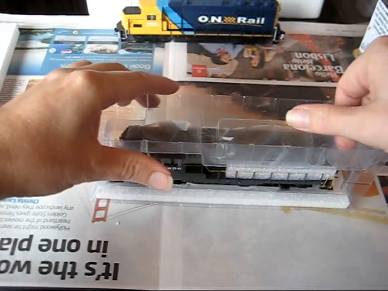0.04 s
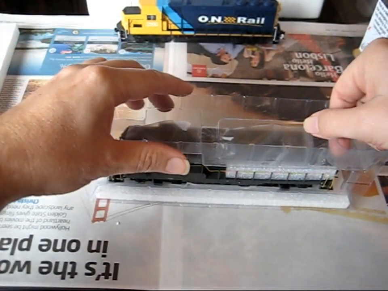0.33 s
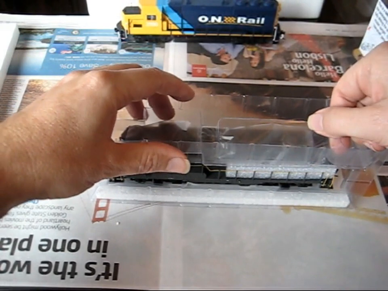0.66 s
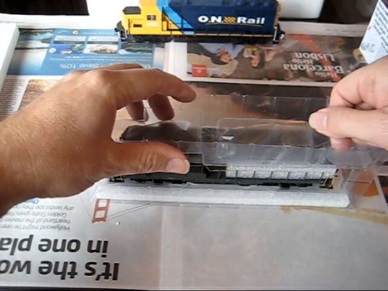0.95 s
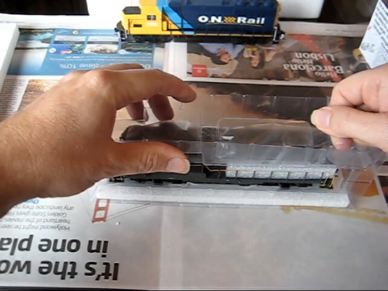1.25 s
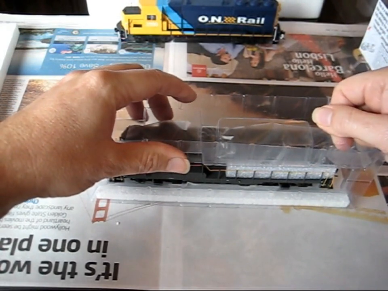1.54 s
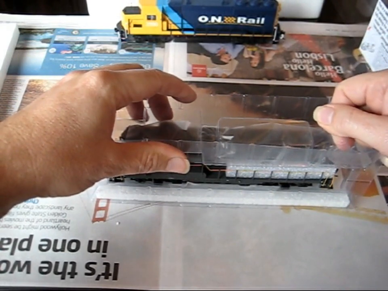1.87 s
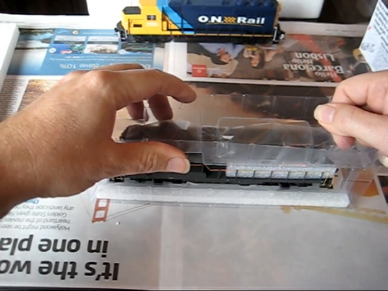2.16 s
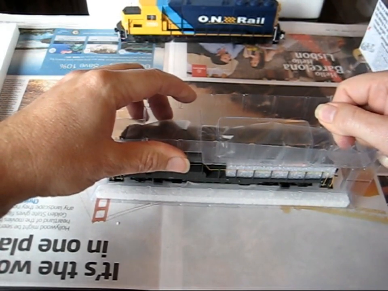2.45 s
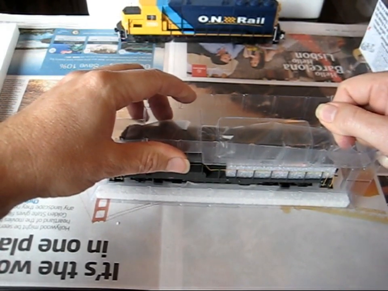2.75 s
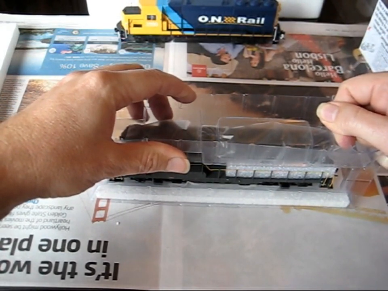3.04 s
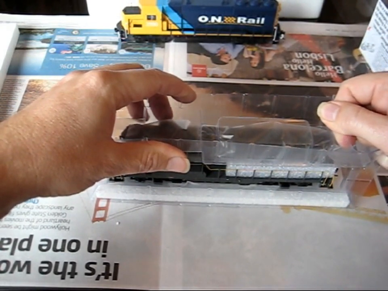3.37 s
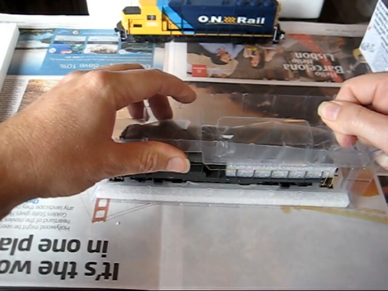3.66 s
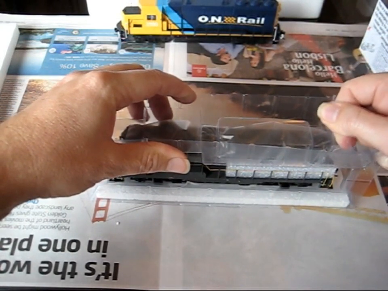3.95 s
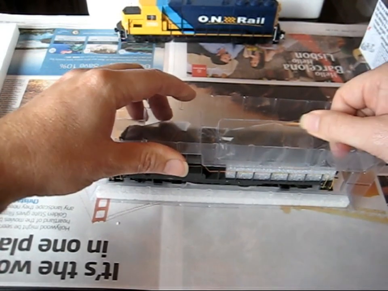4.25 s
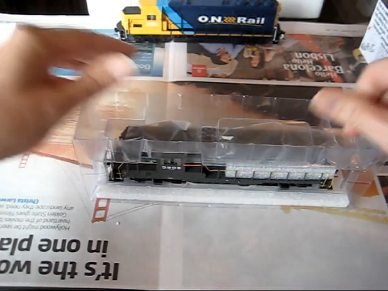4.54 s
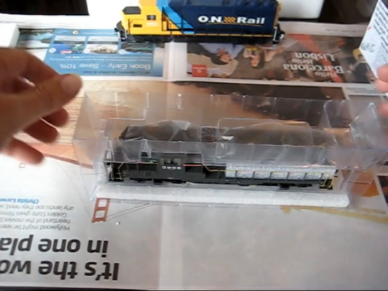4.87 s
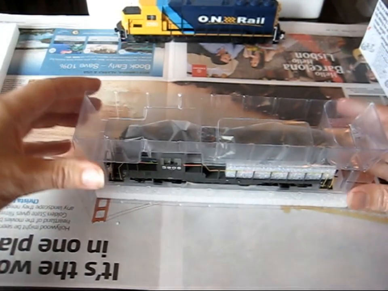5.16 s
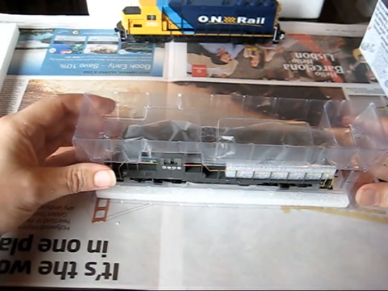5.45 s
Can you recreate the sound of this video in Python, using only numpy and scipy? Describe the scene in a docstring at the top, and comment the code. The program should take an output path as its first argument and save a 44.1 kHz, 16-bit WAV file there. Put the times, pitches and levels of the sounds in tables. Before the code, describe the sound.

A plastic sleeve slides off with a quick swish. Hands then work at a stiff plastic pack on a table, making soft rubbing, a few bright snaps, faint ticks and small hollow knocks. About four seconds in, the lid comes free with a light thud and a flurry of clicks and rustling. Fingers stroke a flap and a few clicks follow. The microphone is close, in a small room with soft hiss and a thin whine.

```python
"""Hands unfold a stiff plastic blister pack on a paper-covered table, close to a small, thinly whining camera.
Over soft room noise the sleeve swishes off, the plastic groans faintly and the lid buckles in bright snaps.
The tray ticks under the fingers while sheet rubs on sheet and panels give way with hollow knocks.
Near 4 s the lid comes free with a thud and a flurry of clicks; then fingers stroke the end flap
and a few last clicks follow. A small room answers each move briefly."""
import sys
import numpy as np
from scipy import signal
from scipy.fft import rfft, irfft, next_fast_len
from scipy.io import wavfile
from scipy.ndimage import uniform_filter1d

SR = 44100
rng = np.random.default_rng(int(sys.argv[2]) if len(sys.argv) > 2 else 0)


def dump(signal):
    """Clip the signal to [-1, 1] and save it as 16-bit WAV at the path in sys.argv[1]."""
    limited = np.clip(np.atleast_2d(signal).T, -1, 1)
    pcm = np.round(limited * 32767).astype(np.int16)
    wavfile.write(sys.argv[1], SR, pcm)


N = 251811
TAPS = 4096  # samples in one click, knock or filter
HZ = np.fft.rfftfreq(TAPS, 1 / SR)
TIME = np.arange(N) / SR

# resonances of the lid: (frequency [Hz], width [Hz], level [dB])
LID_MODES = [(900, 98, -1.5), (1296, 450, 8), (1380, 120, 7), (2310, 230, 1), (2926, 100, 0),
             (3150, 120, 0), (3830, 140, -8), (4820, 240, -4.5), (5270, 700, -11), (6170, 200, -6.5),
             (6920, 260, -7), (7930, 300, -10.5), (8740, 430, -8.5), (11100, 600, -16), (12600, 1000, -18)]


def amp(db):
    """Decibels to gain."""
    return 10 ** (np.asarray(db) / 20)


def unit_rms(x):
    """Scales to rms 1."""
    return x / np.sqrt(np.mean(x ** 2) + 1e-20)


def curve_at(points, hz):
    """Reads a (frequency, value) curve on a log-frequency axis."""
    f, value = np.transpose(points)
    return np.interp(np.log(hz + 1), np.log(f + 1), value)


def add(mix, start_s, sound):
    """Mixes a sound in at its start time."""
    part = mix[max(round(start_s * SR), 0):][:len(sound)]
    part += sound[:len(part)]


def causal(gain):
    """The most compact causal response with this gain on the grid HZ."""
    log_gain = np.log(np.maximum(gain, 1e-5))
    mirrored = np.concatenate([log_gain, log_gain[-2:0:-1]])
    return np.fft.ifft(np.exp(np.conj(signal.hilbert(mirrored)))).real


def drift(rate_hz):
    """A smooth random wander of rms 1, mostly slower than rate_hz."""
    size = next_fast_len(N)
    hz = np.fft.rfftfreq(size, 1 / SR)
    spectrum = rfft(rng.standard_normal(size)) / (1 + (hz / rate_hz) ** 4)
    return unit_rms(irfft(spectrum, size)[:N])


def held_envelope(moves, attack_s, release_db_per_s):
    """Each move gathers speed, holds it and dies away; overlapping moves add in power."""
    power = np.zeros(N)
    for start, length, db in moves:
        t = TIME - start
        attack = np.clip(t / attack_s, 0, 1)
        power += (attack * amp(db - release_db_per_s * np.maximum(t - length, 0))) ** 2
    return np.sqrt(power)


def arch_envelope(moves, steepness):
    """Each quick move speeds up and slows down in one arch."""
    return sum(amp(db) * abs(np.sin(np.pi * np.clip((TIME - start) / length, 0, 1))) ** steepness
               for start, length, db in moves)


def shell(modes):
    """Gain on the grid HZ of a thin shell with these resonances."""
    power = sum(amp(db) ** 2 / (1 + ((HZ ** 2 - hz ** 2) / (width * HZ + 1)) ** 2)
                for hz, width, db in modes)
    return np.sqrt(power)


def room_tone():
    """A steady bed of room noise and microphone hiss."""
    # noise colour: (frequency [Hz], level [dB])
    colour = [(20, -7.5), (50, -4.5), (190, -3.5), (255, 0.5), (330, -0.5), (1400, -4), (3000, -7.5),
              (5000, -9.5), (6000, -10), (8500, -14.5), (10500, -13), (12500, -19.5), (14000, -14.5),
              (15200, -25)]
    gain = amp(curve_at(colour, np.fft.rfftfreq(N, 1 / SR)))
    return amp(-50) * unit_rms(irfft(rfft(rng.standard_normal(N)) * gain, N))


def camera_whine():
    """The camera's clock runs slightly fast and is pulled back into step at every picture frame."""
    # clock partials: (harmonic number, level [dB])
    partials = [(1, -63), (2, -61.5)]
    # weaker steady electronic tones: (frequency [Hz], level [dB])
    steady_tones = [(7854, -72), (7881, -75), (15625, -79)]
    clock_hz, frame_hz, fast_by_hz = 7560, 30, 9
    lead = uniform_filter1d(fast_by_hz * (TIME % (1 / frame_hz)), size=170)
    turns = clock_hz * TIME + lead + 0.013 * drift(8)
    clock = sum(amp(db) * unit_rms(np.sin(2 * np.pi * k * turns)) for k, db in partials)
    tones = sum(amp(db) * unit_rms(np.sin(2 * np.pi * hz * TIME + 0.33 * drift(8)))
                for hz, db in steady_tones)
    return amp(0.4) * (clock + tones)


def room_tail(x):
    """Shell and room ring on in a short, dense tail whose treble dies first."""
    # decay times: (frequency [Hz], t60 [s])
    decay = [(300, 0.49), (1300, 0.31), (4500, 0.17), (9000, 0.1), (15000, 0.19)]
    hz, t, noise = signal.stft(rng.standard_normal(SR // 2), SR, nperseg=256)
    tail = signal.istft(noise * amp(-60 * t / curve_at(decay, hz)[:, None]), SR, nperseg=256)[1]
    tail *= 1 - np.exp(-(np.arange(len(tail)) / SR / 0.0018) ** 2)  # soft onset
    return signal.fftconvolve(x, tail / np.linalg.norm(tail))[:N]


def plastic_groan():
    """As the plastic slides, its slips lock briefly into one faint, unsteady note."""
    # the slide: (start [s], length [s], level [dB])
    moves = [(.19, .22, -54.5)]
    pitch_hz = 454 * (1 + 0.039 * drift(66))
    tone = unit_rms(np.sin(2 * np.pi * np.cumsum(pitch_hz) / SR))
    return arch_envelope(moves, steepness=0.72) * amp(3.3 * drift(30)) * tone


def friction(colour, slips_per_s, spread_db, flutter_db, resonance):
    """Tiny stick-slip grains of uneven size, coloured by the sheet that they shake."""
    sizes = amp(spread_db * np.minimum(rng.exponential(1, N), 4)) * rng.choice([-1, 1], N)
    grains = sizes * (rng.random(N) < slips_per_s / SR)
    lid_db = 20 * np.log10(shell(LID_MODES) + 1e-4)
    ripple_db = lid_db - uniform_filter1d(lid_db, size=150)  # the lid's peaks without its overall tilt
    sheet = causal(amp(curve_at(colour, HZ) + resonance * ripple_db))
    return unit_rms(signal.oaconvolve(grains, sheet)[:N] * amp(flutter_db * drift(60)))


def sheet_rub():
    """Sheet rubs on sheet in a soft, fluttering rustle."""
    # rubs: (start [s], length [s], level [dB])
    moves = [(.02, 0.16, -47.5), (.21, 0.32, -53), (.71, 0.053, -47.5), (1.1, .05, -50.5),
             (1.47, 1.0, -62.5), (4.05, .05, -44.5), (4.11, 0.12, -41), (4.285, 0.19, -42)]
    # rustle colour: (frequency [Hz], level [dB])
    colour = [(180, -20), (300, -16), (691, -2), (1470, -0.5), (1850, 7.5), (2100, -0.5), (2360, 4),
              (3070, -1), (3790, -0.5), (6300, -4), (7670, -11), (11400, -13.5), (15000, -24)]
    envelope = held_envelope(moves, attack_s=0.014, release_db_per_s=132)
    return envelope * friction(colour, slips_per_s=5000, spread_db=1, flutter_db=2.5, resonance=0.26)


def flap_stroke():
    """Fingers stroke along the end flap with a smooth, even grain."""
    # strokes: (start [s], length [s], level [dB])
    moves = [(5.222, 0.031, -46), (5.275, 0.13, -42), (5.44, .04, -47), (5.48, 0.076, -42.5),
             (5.665, 0.016, -42.5)]
    # stroke colour: (frequency [Hz], level [dB])
    colour = [(180, -38), (300, -22), (459, -24), (550, -1.5), (616, -19), (1110, -7), (1290, -9.5),
              (1650, -0.5), (1880, -7), (2320, -3.5), (3920, -6), (4770, -8), (15000, -24.5)]
    envelope = held_envelope(moves, attack_s=0.015, release_db_per_s=190)
    return envelope * friction(colour, slips_per_s=5000, spread_db=0.5, flutter_db=1.1, resonance=0.37)


def sleeve_swish():
    """The sleeve slides off in a short tug and a longer pull."""
    # tug and pull: (start [s], length [s], level [dB])
    moves = [(-.013, .036, -32.5), (.017, 0.059, -26)]
    # swish colour: (frequency [Hz], level [dB])
    colour = [(180, -40), (300, -25), (685, -26), (835, -9), (1350, -14.5), (2070, 3), (2830, -8),
              (3870, 2), (4420, -13.5), (5130, 1), (10100, -17), (12700, -20), (15500, -48)]
    envelope = arch_envelope(moves, steepness=1.24)
    return envelope * friction(colour, slips_per_s=9000, spread_db=2.5, flutter_db=1.5, resonance=0.49)


def panel_mode(hz, db, t60):
    """One mode of a panel, swelling within its first cycle and quickly damped."""
    t = np.arange(TAPS) / SR
    envelope = (1 - np.exp(-2 * hz * t)) * np.exp(-np.log(1000) * t / t60)
    return amp(db) * envelope * np.sin(2 * np.pi * hz * t)


def table_thud():
    """The pack thuds on the table as the lid comes free."""
    # low modes of the thud: (frequency [Hz], level [dB], t60 [s])
    modes = [(90, -34, .03), (260, -27.5, 0.016)]
    out = np.zeros(N)
    add(out, start_s=4.1215, sound=sum(panel_mode(*row) for row in modes))
    return out


def panel_knocks():
    """A whole panel gives way and rings with one hollow note, the higher the shorter."""
    # knocks: (time [s], pitch [Hz], level [dB])
    knocks = [(.9415, 2900, -25), (2.0142, 2380, -27.5), (2.074, 980, -36.5), (2.8187, 1100, -38),
              (3.9005, 1166, -24), (4.0835, 935, -26.5), (4.123, 1734, -14), (4.333, 1400, -28),
              (5.0573, 954, -29.5), (5.669, 1240, -29)]
    out = np.zeros(N)
    for start, hz, db in knocks:
        add(out, start, panel_mode(hz, db, t60=30 / hz))
    return out


def shape_registers(spectrum, levels_db, depth_db, bright_db):
    """Voices a click: a wider patch of plastic lifts the low registers, a sharper crease the high ones."""
    # borders of the bass, middle, presence, treble and top registers: (frequency [Hz])
    edges = [350, 1000, 1900, 3300, 5600, 14500]
    # per register: (lift [dB per dB of depth])
    depth_lift = [1, .4, 0, 0, 0.031]
    # per register: (lift [dB per dB of brightness])
    bright_lift = [0, 0.41, 0, 0.72, 0.92]
    click_s = 0.008  # a click's level is its energy spread over this time
    band = np.digitize(HZ, edges)
    centres = np.sqrt(np.multiply(edges[1:], edges[:-1]))
    target = amp(levels_db + depth_db * np.array(depth_lift) + bright_db * np.array(bright_lift))
    for _ in range(2):  # two passes, as neighbouring registers pull on each other
        energy = 2 * np.bincount(band, abs(spectrum) ** 2)[1:-1] / TAPS
        log_gain = np.log(target / np.sqrt(energy / (click_s * SR)))
        spectrum = spectrum * rfft(causal(np.exp(curve_at(np.c_[centres, log_gain], HZ))))
    return spectrum


def clicks(rows, modes, registers_db, slip_share, bounce_ms, bounce, travel_ms, soft_hz,
           gain_db, ring_db, ring_per_depth):
    """Each click is one sudden give and a brief run of slips, ringing the shell and bouncing off the table."""
    direct, ringing = np.zeros(N), np.zeros(N)
    ms, khz = np.arange(TAPS) / SR * 1e3, HZ / 1e3
    # a small shell radiates little bass, and the contact softens the highest treble
    radiated = shell(modes) * HZ ** 3 / np.hypot(HZ ** 3, 420 ** 3) / np.hypot(1, (HZ / soft_hz) ** 3)
    # bending waves carry treble faster than bass; travel_ms is their delay at 1 kHz
    body = rfft(causal(radiated)) * np.exp(-2j * np.pi * 2 * travel_ms * np.sqrt(khz))
    for start, db, depth_db, bright_db, slip_ms in rows:
        slips = rng.standard_normal(TAPS) * np.exp(-(ms / (2 * max(slip_ms, .1))) ** 2)
        force = slip_share * slip_ms * slips / np.linalg.norm(slips)
        force[0] += 1  # the sudden give
        echo = 1 + bounce * np.exp(-2j * np.pi * khz * bounce_ms * rng.uniform(0.88, 1.04))
        levels_db = db + gain_db + np.array(registers_db)
        spectrum = shape_registers(rfft(force) * body * echo, levels_db, depth_db, bright_db)
        add(direct, start, irfft(spectrum))
        # the room gathers sound from every side of the shell, which evens out single resonances
        diffuse = np.sqrt(abs(uniform_filter1d(abs(spectrum) ** 2, size=110)))
        diffuse *= HZ ** 2 / (HZ ** 2 + 600 ** 2)
        # a deeper click shakes more of the shell and leaves more after-ring
        add(ringing, start, causal(diffuse) * amp(ring_db + ring_per_depth * depth_db))
    return direct + room_tail(ringing)


def strain_ticks():
    """Click rows for the gripped tray, which ticks faintly at loose intervals under strain."""
    # spells of strain: (start [s], length [s], level [dB], brightness [dB])
    spells = [(0.299, .32, -55, -5), (1.45, 0.87, -53, -6)]
    ticks_per_s, spread_db, depth_db, slip_ms = 8, 0.5, 9, 2.5
    rows = []
    for start, length, db, bright_db in spells:
        for k, (jitter, softness) in enumerate(rng.uniform(-1, 1, (20, 2))):
            delay = (k + (1 + jitter) / 2) / ticks_per_s
            if delay < length:
                rows.append((start + delay, db - spread_db * softness, depth_db, bright_db, slip_ms))
    return rows


def tray_ticks():
    """The loaded tray gives under the fingers in small, duller ticks."""
    # ticks: (time [s], level [dB], depth [dB], brightness [dB], slip length [ms])
    ticks = [(.2748, -37, -7, -1, 1.3), (.2934, -47, 3, -4, 1.1), (.498, -47, -7, -3, 2.5),
             (.6878, -44.5, 14, 0, 0.94), (.7195, -43, 10, -4, 3), (1.5737, -42, 9.5, -5, 1.2),
             (1.6815, -49.5, -1, 5.5, 0.8), (1.8717, -49.5, 4, -12, 2.3), (1.9534, -46.5, 1, -19, 1.4),
             (2.0145, -42, -2, -8.5, 0.99), (2.2285, -53.5, -3, 6, 0.85), (2.417, -44, -15, 2.5, 3.3),
             (2.4229, -49.5, 10, 1, 2.3), (2.431, -47.5, 7, 6.5, 1), (2.4615, -47.5, 8, 3, 0.88),
             (2.8687, -48.5, 1, -13, 1.5), (3.3585, -46.5, 6, 0, 2.5), (3.436, -53, -3, 5.5, 2.3),
             (3.5095, -45.5, -3, -13, 1), (3.533, -32.5, -14, -0.5, 0.82), (3.803, -33.5, -13.5, 2, 1.14),
             (3.904, -32.5, -3.5, 3, 0.97), (3.9942, -30, -19, 5.5, 0.72), (4.0839, -43.5, 8.5, -3, 3.4),
             (4.1228, -23, -11, -0.5, 1.0), (4.1504, -40, -4, 1, 1.9), (4.1952, -33.5, -2.5, -2.5, 1.4),
             (4.2297, -44.5, 11, 2, 6.8), (4.2547, -43, -11, 5, 0.7), (4.3325, -43, -3, 3, 1.7),
             (4.3973, -34, -19, -15, 1.1), (4.4454, -39.5, 10, -1, 4.3), (4.4886, -38.5, 6, 4, 1.7),
             (4.6025, -53.5, 13.5, 0, 6), (5.615, -48, 10.5, -3, .8), (5.6441, -45, 5, 1.5, 6.6),
             (5.6709, -38.5, 6, -6, 1.7)]
    # resonances of the tray: (frequency [Hz], width [Hz], level [dB])
    modes = [(714, 234, 15), (1270, 400, 6.5), (1570, 400, -3.5), (2600, 150, -9), (3560, 490, -0.5),
             (4710, 230, -1), (5540, 330, -2.5), (5880, 230, -7), (7340, 700, -21), (9500, 830, -9),
             (12500, 2000, -19)]
    # tone of a plain tick, per register from bass to top: (level offset [dB])
    registers_db = [-6.5, -1, -0.5, -0.5, -11]
    return clicks(ticks + strain_ticks(), modes, registers_db, slip_share=1.0, bounce_ms=0.783,
                  bounce=0.27, travel_ms=0.418, soft_hz=13000, gain_db=0.6,
                  ring_db=-13.5, ring_per_depth=0.16)


def lid_snaps():
    """The stiff lid buckles in bright snaps."""
    # snaps: (time [s], level [dB], depth [dB], brightness [dB], slip length [ms])
    snaps = [(.4556, -39, -10, -2.5, 1.35), (.628, -41, -0.5, -5, 2.2), (.7022, -29, 5.5, 4, 1.56),
             (.7332, -41.5, 0, 2, 2), (.9438, -32.5, 6.5, 0, 1.63), (1.0898, -29.5, 1, 1, 1.6),
             (2.4535, -38.5, 1, -6.5, .94), (2.914, -43.5, -0.5, -1, 1.6), (4.2125, -20.5, -10.5, -12.5, 1),
             (4.3697, -41.5, -11, 3.5, 0.93), (4.4073, -29, 1, 3.5, 1.3), (4.4376, -45.5, 4, 4.5, 1.7),
             (4.5217, -34.5, -7.5, 1.5, 1.4), (5.6871, -49, 1, 14.5, 4.1)]
    # tone of a plain snap, per register from bass to top: (level offset [dB])
    registers_db = [-8, -2.5, 0.5, 4.5, 0]
    return clicks(snaps, LID_MODES, registers_db, slip_share=0.89, bounce_ms=1.22, bounce=0.32,
                  travel_ms=0.82, soft_hz=14100, gain_db=-0.94, ring_db=-10.5, ring_per_depth=0.37)


def scene():
    """Everything reaches one microphone, alike in both channels."""
    crackle = lid_snaps() + tray_ticks()
    handling = sleeve_swish() + sheet_rub() + flap_stroke()
    handling += panel_knocks() + table_thud() + plastic_groan()
    mono = crackle + handling + amp(-20) * room_tail(handling) + room_tone() + camera_whine()
    return np.array([mono, mono])


def record(dry):
    """The camera's band limit cuts off the highest treble."""
    edge_hz = 15900
    low_pass = signal.firwin(511, edge_hz, window=("kaiser", 9), fs=SR)
    return signal.oaconvolve(dry, low_pass[None], "same")


dry = scene()
out = record(dry)
dump(out)
```